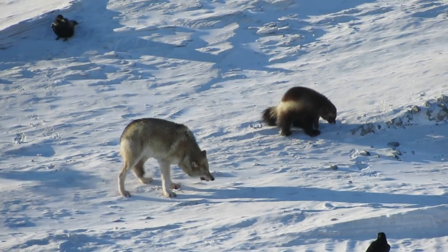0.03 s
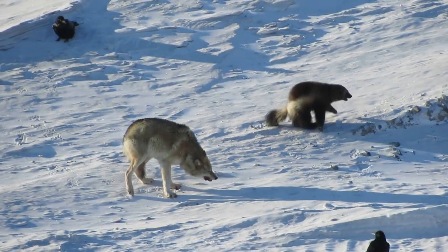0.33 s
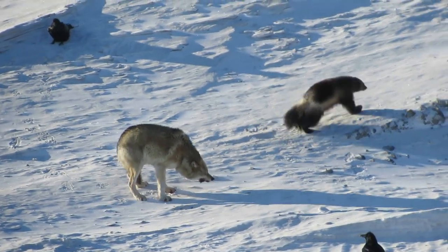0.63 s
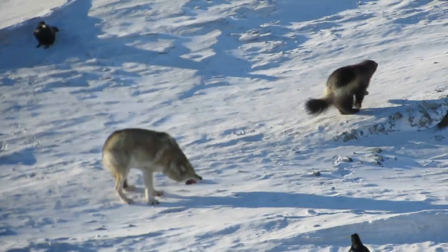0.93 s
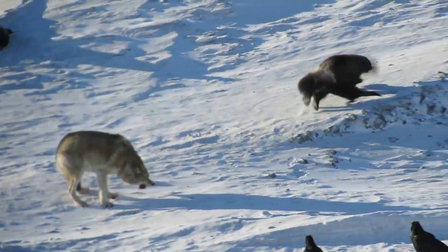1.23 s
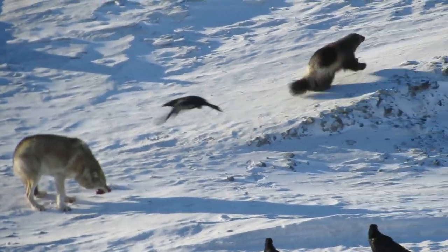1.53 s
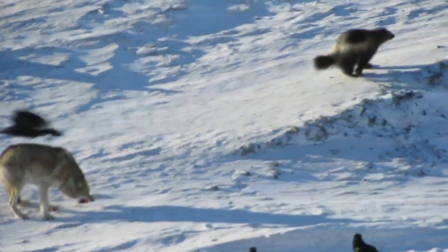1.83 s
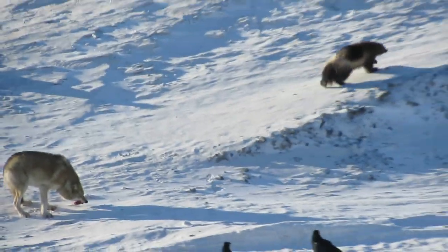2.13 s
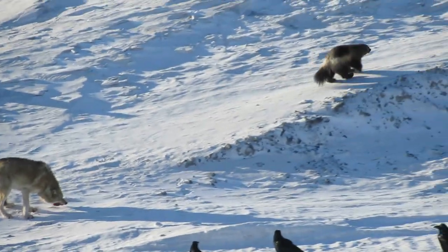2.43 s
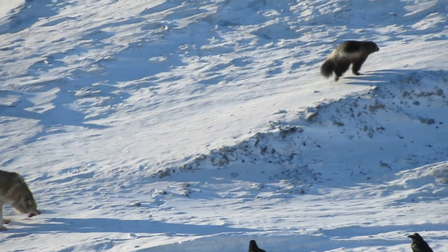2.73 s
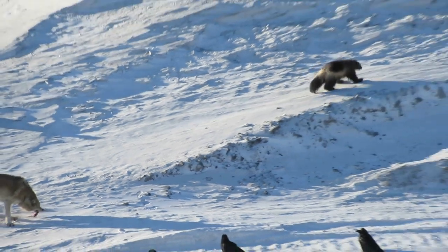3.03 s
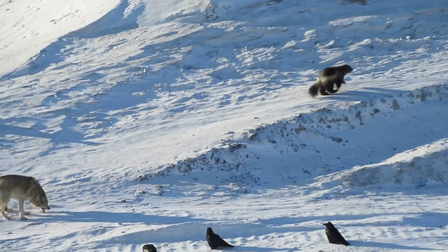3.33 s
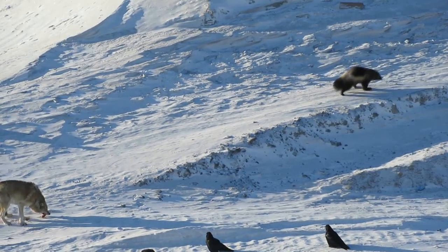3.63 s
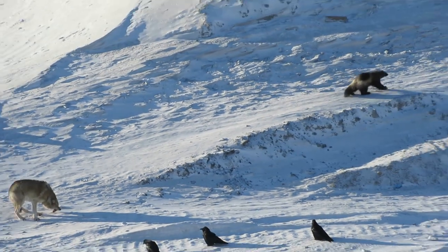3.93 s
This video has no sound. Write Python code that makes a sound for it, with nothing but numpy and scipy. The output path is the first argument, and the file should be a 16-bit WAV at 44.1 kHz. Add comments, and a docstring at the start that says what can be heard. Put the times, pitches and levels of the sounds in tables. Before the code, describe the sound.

Harsh raven croaks outdoors, with a low engine hum, camera clicks and faint zoom whirrs.

```python
"""Ravens croak over an idling engine and outdoor hiss on a snowy hillside.
Five harsh croaks: a fluttering pitch sweeps harmonics through throat resonances. One clear, higher call.
The engine hums at multiples of its cycle rate; its metal rings once a cycle.
A camera's zoom motor whirrs three times amid sharp handling clicks and one brief swish.
The level dips as each run starts. From the first run on, the hiss is thinner, a treble band hollowed."""
import sys
import numpy as np
from scipy import signal
from scipy.fft import rfft, irfft
from scipy.io import wavfile

SR = 44100
rng = np.random.default_rng(int(sys.argv[2]) if len(sys.argv) > 2 else 0)


def master(y):
    """Save y as 16-bit WAV."""
    cut = np.clip(np.atleast_2d(y).T, -1, 1)
    pcm = np.round(cut * 32767)  # scale
    wavfile.write(sys.argv[1], SR, pcm.astype(np.int16))


N = 176400
TIME = np.arange(N) / SR

# croaks (start [s], length [s], level [dB], pitch [Hz], gain of harmonics 3 and up [dB])
CROAKS = [(0.264, 0.2, -31.5, 500.5, -7), (0.776, .199, -31, 499.5, -2), (1.315, .21, -32, 499, -3),
          (2.821, .202, -33, 502.7, -4.5), (3.353, .212, -33.5, 493.6, -9)]
# flutter within a croak (age [s], rate [Hz], swing [share of pitch], dip at crest [0-1])
FLUTTER = [(0, 67, .09, .95), (.055, 66, .115, .85), (.1, 48.5, .135, .5), (.2, 42, .135, .45)]
# throat and beak response (frequency [Hz], gain [dB])
THROAT = [(380, -33.5), (560, -11.5), (740, -22), (850, -2), (940, 2), (1040, 3), (1140, -3), (1260, -10.5),
          (1450, -10), (1680, -4.5), (1900, -28), (2400, -15.5), (2750, -13.5), (3100, -23.5), (4500, -37),
          (7000, -60)]
# clear call (time [s], pitch [Hz], level [dB])
CALL_CONTOUR = [(3.276, 713, -41), (3.295, 751.5, -39), (3.321, 806, -39.5), (3.353, 822, -37),
                (3.41, 815, -39), (3.47, 809, -39), (3.504, 782, -40), (3.525, 729, -37.5),
                (3.538, 690, -62)]
# its harmonics, fundamental first (relative level [dB])
CALL_HARMONICS_DB = [-13, 0, -7, -28, -30, -36, -31, -37, -37]
# motor runs (start [s], end [s], whirr level [dB])
ZOOM_RUNS = [(1.637, 2.35, -51.5), (2.821, 3.38, -52.5), (3.818, 4.1, -52)]
# motor whirr (frequency [Hz], relative density [dB])
MOTOR_SPECTRUM = [(3000, -7.5), (4200, -8), (4600, 0.5), (5300, -3), (5700, -5.5), (7000, -10),
                  (7900, -1.5), (8800, -8), (10000, -11.5), (10800, -2), (11600, -12.5), (12500, -16),
                  (15000, -18)]
# handling clicks (time [s], body drive [dB], snap drive [dB], grit decay [s])
CLICKS = [(1.0365, -33, -49, 0.0024), (1.401, -23, -55, 0.0011), (1.414, -25, -52, .001),
          (1.499, -26, -44, .001), (1.5832, -20, -42, 0.00092), (1.786, -38, -32, 0.002),
          (1.884, -29.5, -52, .002), (2.0497, -27, -52, 0.003), (2.2947, -18.5, -6.5, 0.002),
          (2.3013, -24, -9, 0.00082), (2.3027, -9, -1.5, 0.00077), (2.3894, -34.5, -37, 0.0013),
          (2.6381, -18.5, -19, 0.0018), (2.772, -28.5, -41, 0.0012), (3.339, -27, -23, .003),
          (3.343, -20.5, -27, 0.0049), (3.346, -11.5, -4, 0.00066), (3.613, -13, -27, 0.00042),
          (3.715, -28, -39, .001)]
# friction before the two loud clicks (release [s], body drive [dB], snap drive [dB])
SCRAPES = [(2.302, -27.5, -27), (3.348, -31.5, -37)]
# shell modes, low body and bright snap (frequency [Hz], gain [dB], t60 [s])
BODY_MODES = [(710, -15, 0.0046), (1270, -9.5, 0.002), (1578, 4, 0.0071), (2270, 1.5, 0.0032),
              (2630, -7.5, 0.0044)]
SNAP_MODES = [(5830, -11.5, 0.00079), (8700, -10, 0.0028), (10030, -8, 0.0025), (11760, -3, .004),
              (13300, -14, 0.0012)]
# soft handling bumps (time [s], level [dB])
BUMPS = [(.965, -33), (3.06, -35)]
# swish (time [s], level [dB])
SWISH_LEVEL = [(1.36, -83), (1.385, -39), (1.415, -41), (1.43, -46.5), (1.53, -46), (1.58, -41.5),
               (1.63, -47), (1.7, -49)]
# swish (frequency [Hz], relative density [dB])
SWISH_SPECTRUM = [(200, -9.5), (700, 0.5), (1600, 8), (2400, 6.5), (3000, -1.5), (3800, -14), (6000, -8),
                  (15000, -37)]
# engine hum (order [x cycle rate], rms level [dB])
ENGINE_ORDERS = [(1, -34), (2, -70), (3, -46), (4, -44), (5, -58), (7, -59.5), (9, -56), (10, -59.5),
                 (10.5, -58.5), (12, -69), (20, -63), (27.5, -60)]
# engine metal resonances (frequency [Hz], width [Hz], rms level [dB])
ENGINE_RINGS = [(1515.7, 28, -49.5), (1602, 63, -61)]
# outdoor noise layers (frequency [Hz], relative density [dB])
AIR_SPECTRUM = [(20, -9), (50, 5), (110, -1), (250, -2.5), (390, -9), (580, -6.5), (800, -9), (1200, -11.5),
                (1500, -11), (1900, -16.5), (2800, -19), (3600, -38), (6000, -58)]
HISS_SPECTRUM = [(1500, -30), (3000, 9), (4200, 6.5), (6000, 4), (8000, 0.5), (11000, -3.5), (15000, -10)]
LATE_HISS_SPECTRUM = [(1500, 18), (2700, 4), (3400, 1.5), (3950, -10), (4700, -9), (6300, 3.5), (8000, 1.5),
                      (11000, -1.5), (15000, -7)]
# their envelopes (time [s], level [dB])
AIR_LEVEL = [(0, -41), (1.6, -42), (2.25, -41.5), (2.4, -46.5), (2.8, -42.5), (3.1, -42.5), (4, -42.5)]
HISS_LEVEL = [(0, -54.5), (1.4, -54.5), (1.7, -53.5), (1.85, -61), (2, -63)]
LATE_HISS_LEVEL = [(1.4, -79), (1.48, -42), (1.58, -47), (1.75, -56), (2.3, -53), (2.42, -55), (2.62, -57),
                   (2.68, -49), (2.79, -49.5), (3.3, -51), (3.52, -55), (3.66, -51), (3.76, -45),
                   (4, -49.5)]
# dips in overall level (start [s], end [s])
DIPS = [(1.634, 1.704), (2.828, 2.898), (3.82, 3.889)]


def croaks():
    """A fluttering pitch swings harmonics in and out of the throat's resonances, making the rattle."""
    attack_s, release_s, arch_db, shimmer_db = .008, .006, 2.5, .8
    first_crest_turns, trough_dip = .62, .35
    jitter_share, sag_share, rasp_share = .016, .03, .09
    ages_s, rates_hz, swings, crest_dips = np.transpose(FLUTTER)
    jitter, shimmer, rasp = drift(250), drift(120), noise(THROAT)
    out = np.zeros(N)
    for start_s, length_s, db, pitch_hz, overtones_db in CROAKS:
        envelope = gate(start_s - attack_s / 2, start_s + length_s, attack_s, release_s)
        on = envelope > 0
        age_s = TIME[on] - start_s
        progress = age_s / length_s
        turns = np.cumsum(np.interp(age_s, ages_s, rates_hz) * (age_s > 0)) / SR
        flutter = np.cos(2 * np.pi * (turns - first_crest_turns))
        swing = np.interp(age_s, ages_s, swings) * flutter
        hz = pitch_hz * (1 + swing + jitter_share * jitter[on] - sag_share * (progress - .5))
        phase = phase_of(hz)
        voice = sum(gain_at(THROAT, k * hz) * from_db(overtones_db * (k > 2)) * np.sin(k * phase)
                    for k in range(1, 12))
        crest, trough = ((1 + flutter) / 2) ** 2, ((1 - flutter) / 2) ** 4
        pulsing = 1 - np.interp(age_s, ages_s, crest_dips) * crest - trough_dip * trough
        voice = unit_rms(voice * pulsing * from_db(shimmer_db * shimmer[on])) + rasp_share * rasp[on]
        swell_db = arch_db * (np.sin(np.pi * progress) - 1)
        out[on] += from_db(db + swell_db) * envelope[on] * voice
    return out


def clear_call():
    """A second bird's harmonic voice in one smooth pitch arch."""
    times_s, hz, db = np.transpose(CALL_CONTOUR)
    jitter = .0068 * drift(110)
    phase = phase_of(np.interp(TIME, times_s, hz) * (1 + jitter))
    voice = sum(from_db(gain_db) * np.sin(k * phase) for k, gain_db in enumerate(CALL_HARMONICS_DB, 1))
    envelope = from_db(np.interp(TIME, times_s, db)) * gate(times_s[0], times_s[-1], .005, .0044)
    return envelope * unit_rms(voice)


def zoom_motor():
    """Thin whirr plus a narrowband whine that peaks as the motor spins up, then sags."""
    settled_hz, peak_hz, spread_hz, settle_s = 4510, 4840, 220, .12
    whine_db, surge_db, surge_s, peak_delay_s = -7, 8.5, .061, .051
    out, whirr = 0, noise(MOTOR_SPECTRUM)
    for start_s, end_s, db in ZOOM_RUNS:
        from_peak_s = abs(TIME - start_s - peak_delay_s)
        phase = phase_of(settled_hz + (peak_hz - settled_hz) * np.exp(-from_peak_s / settle_s))
        whine = drift(spread_hz) * np.cos(phase) + drift(spread_hz) * np.sin(phase)
        whine *= from_db(whine_db) + from_db(surge_db) * np.exp(-from_peak_s / surge_s)
        out += from_db(db) * gate(start_s, end_s, .018, .0084) * (whirr + whine)
    return out


def handling_clicks():
    """Impacts with gritty tails and swelling scrapes ring the camera's shell."""
    scrape_rise_s = .017
    body, snap = np.zeros(N), np.zeros(N)
    grit = .35 * rng.standard_normal(N)
    for time_s, body_db, snap_db, decay_s in CLICKS:
        i = int(time_s * SR)
        contact = grit[i:] * np.exp(-TIME[:N - i] / decay_s)
        contact[0] = 1  # impact
        body[i:] += from_db(body_db) * contact
        snap[i:] += from_db(snap_db) * contact
    for release_s, body_db, snap_db in SCRAPES:
        friction = grit * np.exp(-abs(TIME - release_s) / scrape_rise_s) * (TIME < release_s)
        body += from_db(body_db) * friction
        snap += from_db(snap_db) * friction
    return (ring(body, BODY_MODES) + ring(snap, SNAP_MODES)) / 2


def handling_bumps():
    """Soft knocks on the camera: puffs of low noise."""
    half_width_s = .021
    envelope = sum(from_db(db) * np.exp(-((TIME - time_s) / half_width_s) ** 2) for time_s, db in BUMPS)
    return envelope * noise_band(hz=57.6, width_hz=40)


def swish():
    """A brief, uneven swish of midrange noise around the clicks."""
    envelope = level(SWISH_LEVEL) * gate(SWISH_LEVEL[0][0], SWISH_LEVEL[-1][0], .011, .01)
    midrange = noise(SWISH_SPECTRUM)
    flicker_db = 2.5 * drift(60)
    return envelope * midrange * from_db(flicker_db)


def engine():
    """Idle hum of low orders; ringing metal throbs once a cycle."""
    cycle_hz, wander_share, throb_depth = 28.29, .00394, .85
    phase = phase_of(cycle_hz * (1 + wander_share * drift(3.05)))
    hum = sum(from_db(db) * np.sqrt(2) * np.sin(order * phase + rng.uniform(0, 2 * np.pi))
              for order, db in ENGINE_ORDERS)
    throb = 1 + throb_depth * np.cos(phase)
    metal = sum(from_db(db) * unit_rms(throb * noise_band(hz, width_hz))
                for hz, width_hz, db in ENGINE_RINGS)
    return hum + metal


def background():
    """Dull outdoor noise; a steady hiss gives way to a thinner, uneven one."""
    air = level(AIR_LEVEL) * noise(AIR_SPECTRUM)
    hiss = level(HISS_LEVEL) * noise(HISS_SPECTRUM)
    late_hiss = level(LATE_HISS_LEVEL) * noise(LATE_HISS_SPECTRUM)
    return air + hiss + late_hiss


def from_db(db):
    """Decibels to gain."""
    return 10 ** (np.asarray(db) / 20)


def unit_rms(x):
    """Scale to rms 1."""
    return x / np.sqrt(np.mean(x ** 2) + 1e-20)


def phase_of(hz):
    """Running phase [rad]."""
    return 2 * np.pi * np.cumsum(hz) / SR


def level(curve):
    """Gain along a (time [s], level [dB]) curve."""
    return from_db(np.interp(TIME, *np.transpose(curve)))


def gate(start_s, end_s, attack_s, release_s):
    """Linear attack, hold, release centred on end_s."""
    return np.clip((TIME - start_s) / attack_s, 0, 1) * np.clip((end_s - TIME) / release_s + .5, 0, 1)


def gain_at(spectrum, hz):
    """Gain of a (frequency [Hz], level [dB]) table at hz."""
    points_hz, db = np.transpose(spectrum)
    return from_db(np.interp(np.log(hz + 1), np.log(points_hz), db))


def noise(spectrum):
    """Unit-rms coloured noise, rolled off beyond the table's ends."""
    hz = np.arange(N // 2 + 1) * SR / N
    rolloff = np.minimum(hz / spectrum[0][0], 1) ** 2 / np.maximum(hz / spectrum[-1][0], 1) ** 2
    return unit_rms(irfft(rfft(rng.standard_normal(N)) * gain_at(spectrum, hz) * rolloff, N))


def noise_band(hz, width_hz):
    """Unit-rms noise band, geometric centre hz."""
    low_hz = np.sqrt(hz ** 2 + width_hz ** 2 / 4) - width_hz / 2
    bandpass = signal.butter(2, [low_hz, low_hz + width_hz], "band", fs=SR, output="sos")
    return unit_rms(signal.sosfilt(bandpass, rng.standard_normal(N)))


def drift(corner_hz):
    """Unit-rms random wander."""
    hz = np.arange(N // 2 + 1) * SR / N
    return unit_rms(irfft(rfft(rng.standard_normal(N)) / (1 + (hz / corner_hz) ** 2), N))


def ring(drive, modes):
    """Driven damped modes, signs alternating."""
    out = 0
    for k, (hz, db, t60_s) in enumerate(modes):
        radius = np.exp(-np.log(1000) / (t60_s * SR))
        feedback = [1, -2 * radius * np.cos(2 * np.pi * hz / SR), radius ** 2]
        out += (-1) ** k * from_db(db) * signal.lfilter([.5, 0, -.5], feedback, drive + 1e-18)
    return out


def scene():
    """Mono mix of birds, swish, engine, outdoor noise and camera sounds."""
    mix = croaks() + clear_call() + swish() + engine() + background()
    camera = zoom_motor() + handling_clicks() + handling_bumps()
    return (mix + camera)[None]


def record(dry):
    """A treble notch fades in, the level dips three times, the top is cut."""
    notch_hz, notch_depth, notch_start_s, notch_fade_s = 3890, .77, 1.86, .14
    dip_db, dip_edge_s, cutoff_hz = -18, .002, 15100
    notched = signal.lfilter(*signal.iirnotch(notch_hz, Q=3.65, fs=SR), dry)
    notch_mix = notch_depth * np.clip((TIME - notch_start_s) / notch_fade_s, 0, 1)
    hollowed = dry + notch_mix * (notched - dry)
    dips = sum(gate(start_s, end_s, dip_edge_s, dip_edge_s) for start_s, end_s in DIPS)
    lowpass = signal.ellip(10, .1, 80, cutoff_hz, fs=SR, output="sos")
    return signal.sosfilt(lowpass, hollowed * from_db(dip_db * dips))


dry = scene()
out = record(dry)
master(out)
```